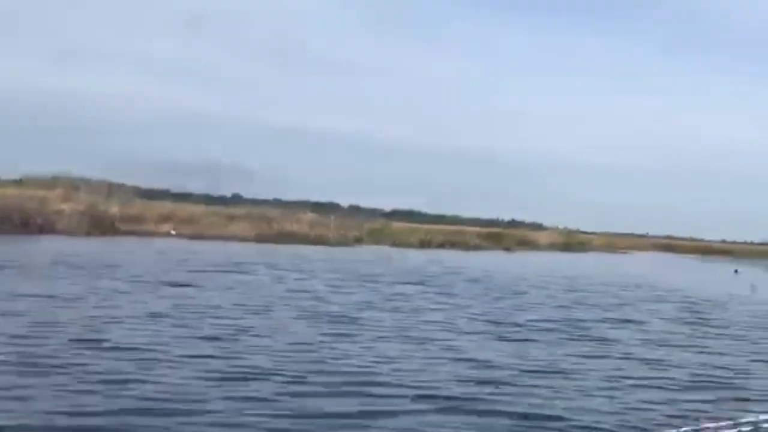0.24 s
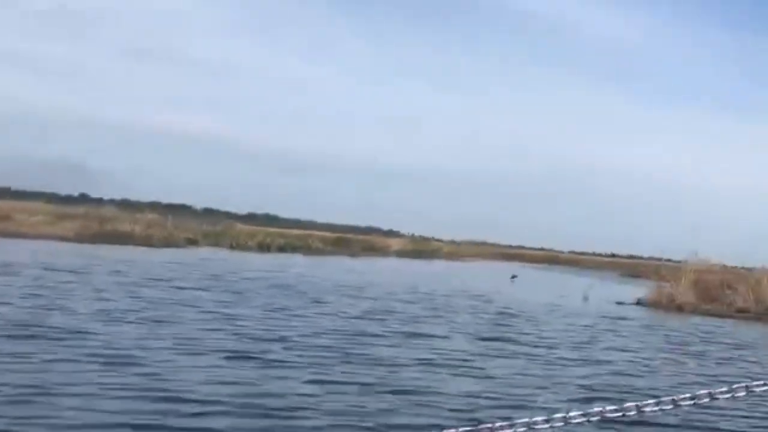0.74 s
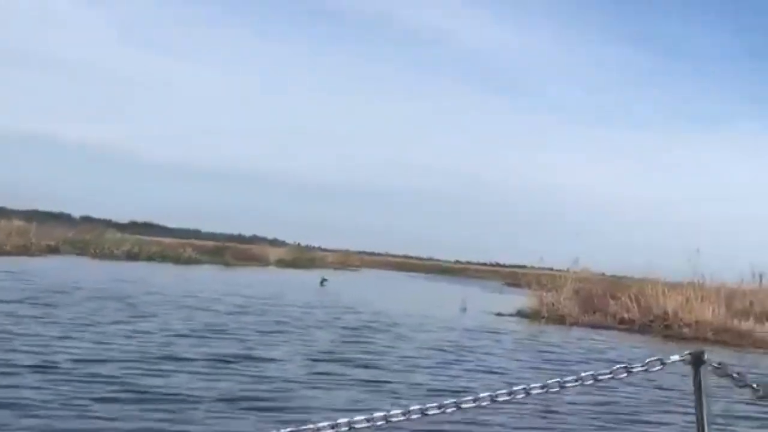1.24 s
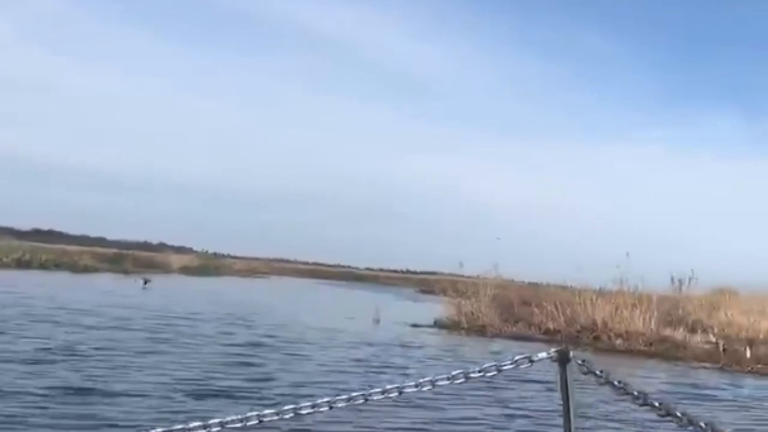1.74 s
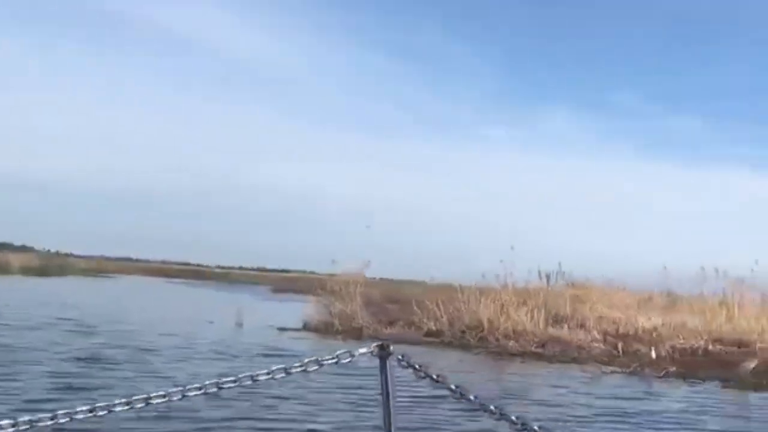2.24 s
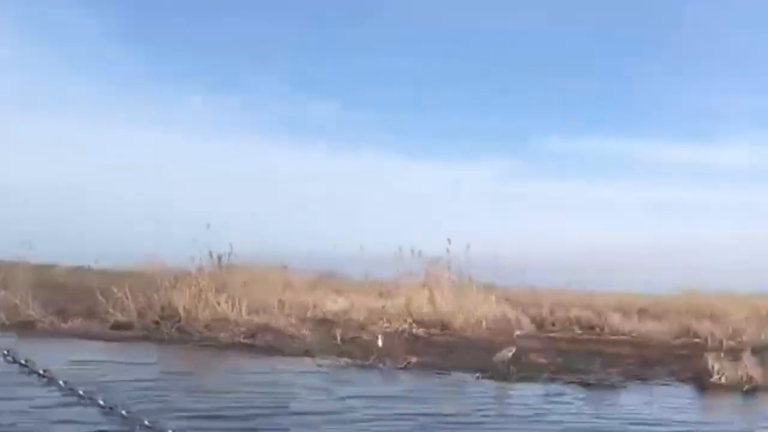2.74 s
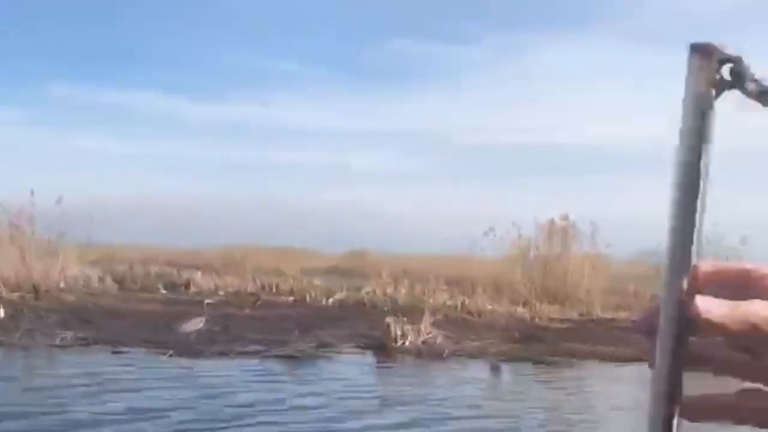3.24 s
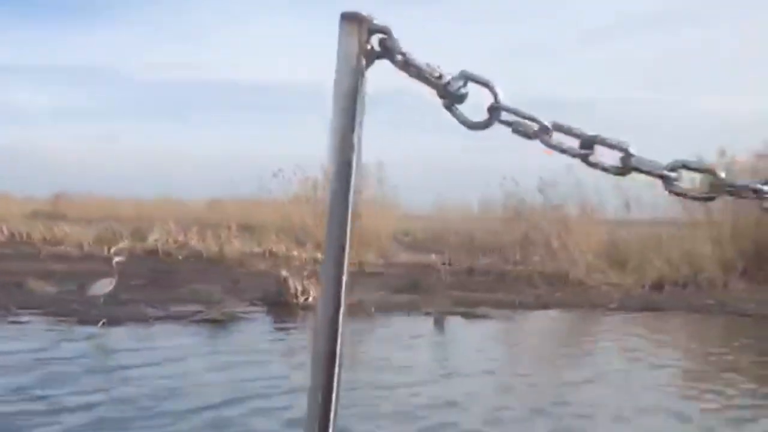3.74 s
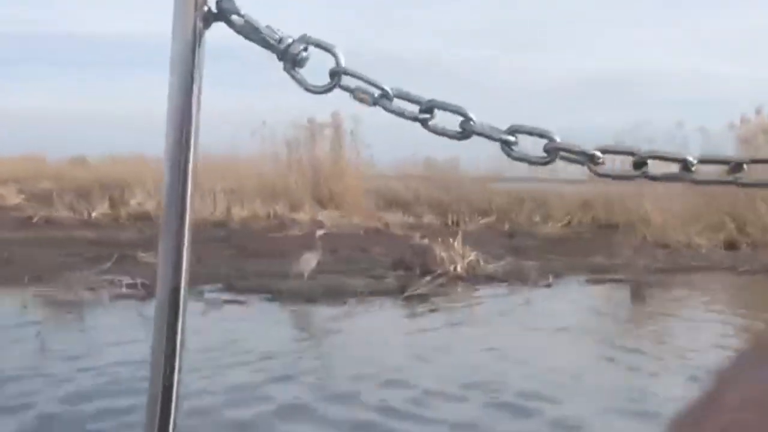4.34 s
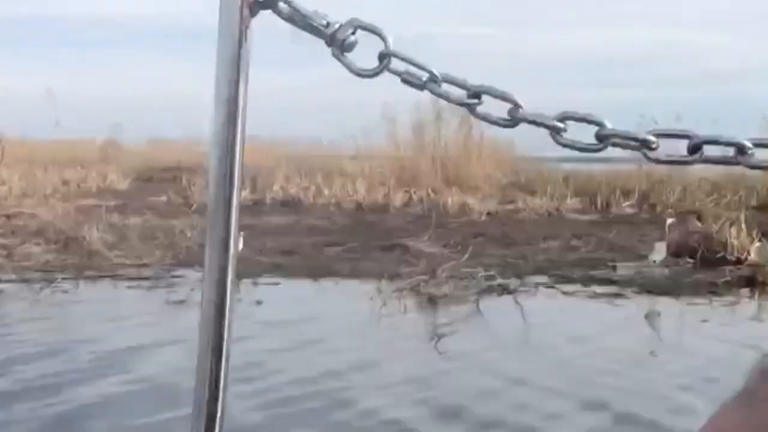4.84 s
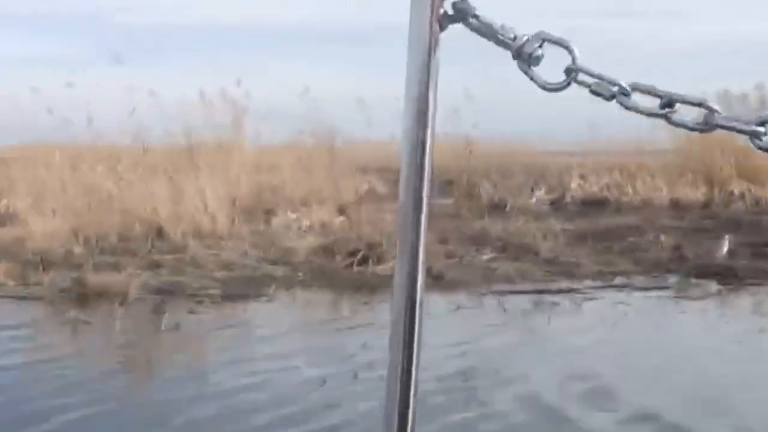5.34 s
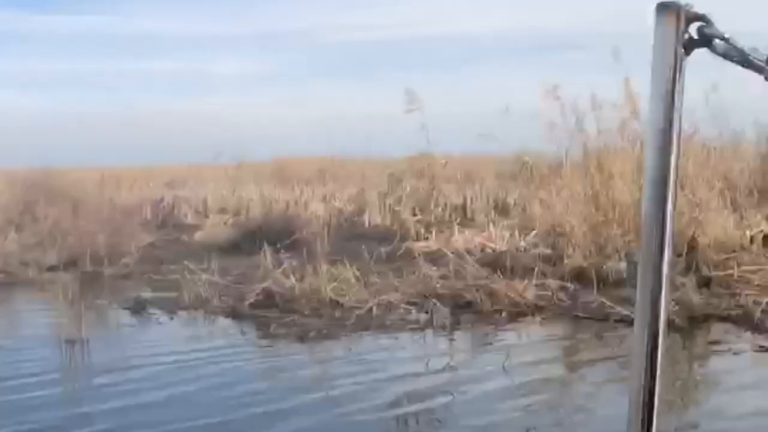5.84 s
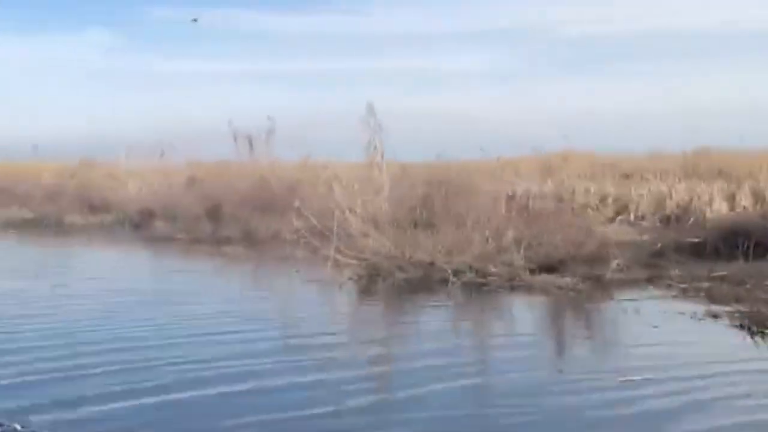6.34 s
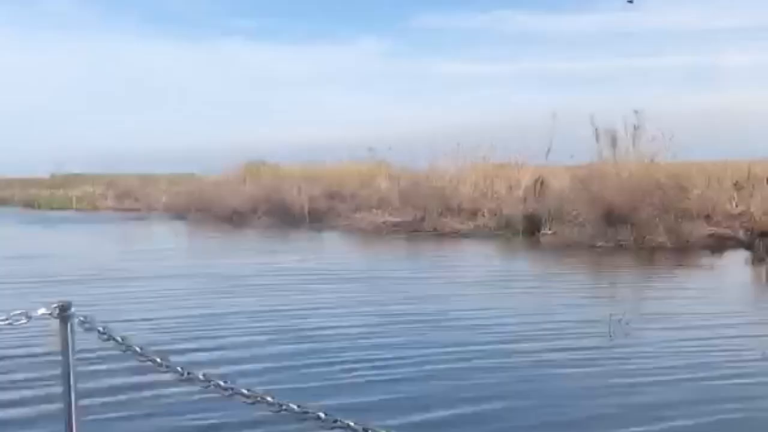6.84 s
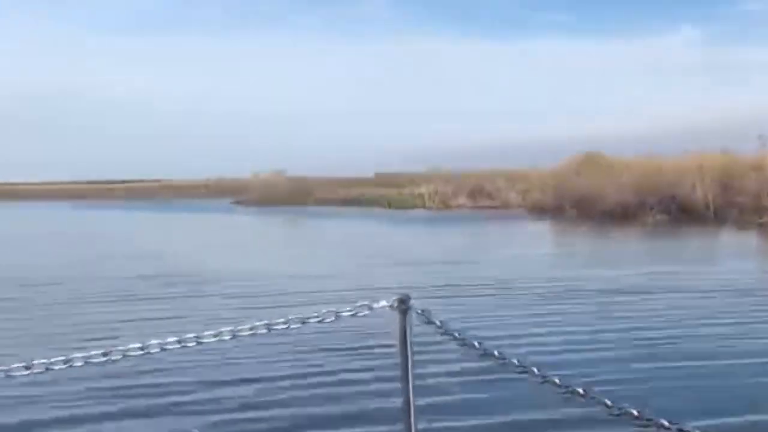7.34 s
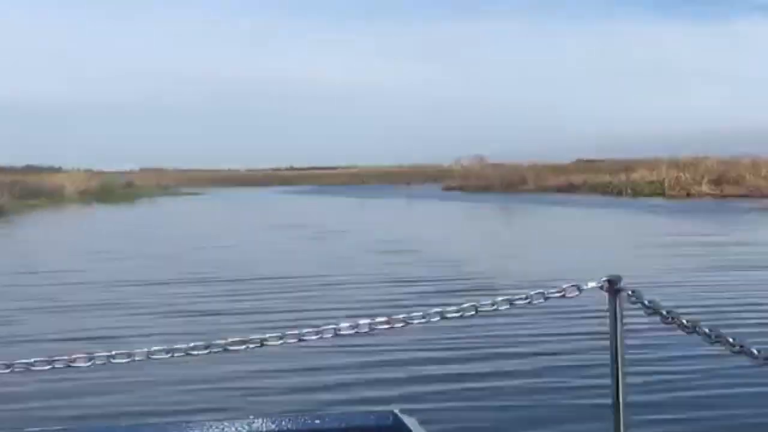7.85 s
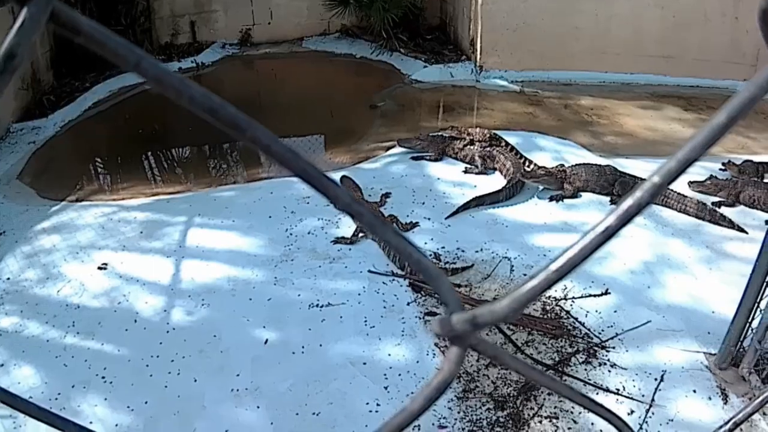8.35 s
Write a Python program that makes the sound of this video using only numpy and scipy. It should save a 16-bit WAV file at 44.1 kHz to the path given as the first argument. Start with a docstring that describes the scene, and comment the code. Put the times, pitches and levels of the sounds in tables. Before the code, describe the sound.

Loud, nasal airboat drone with roaring wind and water, dropping in pitch near the end before a sudden stop.

```python
"""A nasal propeller drone over roaring wash: an airboat on open marsh water, heard from its front seats.
Three blades chop the air; a V8 beats against them through a whining toothed reduction belt.
Wash and spray grow louder while the microphone swings aside. Brief hoots, a hull knock, wind buffets.
Near the end the throttle eases: pitch falls, the exhaust pops, a thin whistle rises. Abrupt stop."""
import sys
import numpy as np
from scipy import signal
from scipy.fft import rfft, irfft, next_fast_len
from scipy.io import wavfile
from scipy.ndimage import uniform_filter1d

SR = 44100
rng = np.random.default_rng(int(sys.argv[2]) if len(sys.argv) > 2 else 0)


def inscribe(sig):
    """Save sig as 16-bit PCM at rate SR to the path in sys.argv[1].

    A 1-D sig is mono; a 2-D sig holds one channel per row.
    Samples are clipped to [-1, 1] before scaling.
    """
    pcm = np.round(np.clip(np.atleast_2d(sig).T, -1, 1) * 32767)
    wavfile.write(sys.argv[1], SR, pcm.astype(np.int16))


N = 379695
TIME_S = np.arange(N) / SR
BLADE_COUNT, PROP_TEETH, CRANK_TEETH = 3, 110, 48
CRUISE_HZ, COAST_HZ_PER_S = 82, 14

# Blade-pass rate: t/s, f/Hz
BLADE_RATE = [(0, 86.6), (0.25, 85.95), (1.2, 85.4), (2.1, 83.1), (2.8, 81.9), (3.2, 81.65), (4.4, 81.8),
              (4.8, 81.4), (5.2, 81.25), (6, 81.55), (6.3, 81.3), (6.5, 80.4), (6.7, 78.4), (7.1, 72.7),
              (7.3, 71.1), (7.6, 70.05), (8.2, 69.75)]
# Microphone swing toward the stern: t/s, turn (0 ahead, about 1 at widest)
MIC_TURN = [(0, 0.15), (2.6, 0.03), (3.2, 0.56), (3.8, 0.84), (4.55, 0.95), (5.2, 0.88), (6.1, .66),
            (6.7, 0.42), (7.1, 0), (8.2, 0.13)]

# Level laws: cruise level/dB, speed slope/(dB/Hz), turned/dB, coasting/dB
RUMBLE_LAW = (-32.5, -0.15, 3.5, -0.5)
ROAR_LAW = (-25, 0.06, 5, 2)
HISS_LAW = (-34.6, 0.17, 2, -1)
SPRAY_LAW = (-41, -0.06, 12, 0.5)
# Blade harmonics except the 4th: order, then the four level-law columns
BLADE_LAWS = [(1, -13.5, 1.1, -1, 1.5), (2, -27.5, -0.2, -1, -1), (3, -32.5, -0.1, 4, -1),
              (5, -36.5, 0.67, 6.5, -10.5), (6, -38.5, 0, -1, -4), (7, -43, .1, 8, -3),
              (8, -43, -0.1, 3.5, -6), (9, -42, 0, -3.5, 3.5), (10, -42, -0.2, 6.5, -1.5),
              (11, -40, 0.64, -0.5, 4), (12, -44.5, -0.2, -4, -2.5), (13, -48.5, -0.6, 1.5, -7),
              (15, -51, -0.1, 2.5, -0.5), (20, -53.5, 0.5, 0.5, -3.5), (24, -60, -0.5, 5.5, -5)]
# Nasal 4th blade harmonic: t/s, level/dB
NASAL_LEVEL = [(0, -19.5), (0.7, -20.5), (1.6, -21), (1.9, -27), (2.65, -30), (3.05, -25), (4.4, -22.5),
               (5.4, -23.5), (5.9, -27), (6.35, -25.5), (6.9, -38), (7.4, -29.5), (8.2, -34)]
# Propeller cage resonances: f/Hz, width/Hz, lift/dB
CAGE_MODES = [(344.3, 23.6, 13), (601.8, 7.7, 10)]

# Rumble of unevenly firing banks: four-stroke cycle order, relative level/dB
RUMBLE_ORDERS = [(2, -5), (3, 1), (6, -11), (7, -9), (8, -17), (10, -17), (12, -17), (15, -19), (16, -19),
                 (18, -14), (24, -22)]
# Exhaust boom, 5th cycle order: t/s, level/dB
BOOM_LEVEL = [(0, -39), (1.2, -30), (1.95, -21.5), (2.7, -42), (5.2, -25), (6.6, -30), (6.9, -27),
              (7.25, -19.5), (8.2, -17)]
# Belt tooth tone and its octave: t/s, level/dB
TOOTH_LEVEL = [(0, -40), (0.5, -48), (0.9, -42), (1.5, -42.5), (1.85, -33), (2.25, -49), (2.45, -34.5),
               (2.6, -41.5), (2.98, -30.5), (3.25, -39), (3.7, -38.5), (4.7, -41.5), (5.2, -49),
               (5.6, -40.5), (6.27, -34.5), (6.47, -41), (6.68, -52), (6.8, -38.5), (6.93, -39.5),
               (7.08, -53), (7.4, -47), (8.2, -56)]
OCTAVE_LEVEL = [(0, -56), (1.85, -49), (2.6, -55), (6.3, -58), (6.7, -54), (6.92, -45), (7.1, -52),
                (7.38, -45), (7.65, -51), (8.0, -46), (8.2, -39)]

# Noise spectra: f/Hz, relative density/dB
ROAR_SPECTRUM = [(20, -27), (35, -24), (55, 1.5), (80, -1), (130, -0.5), (210, 0.5), (270, -1.5),
                 (350, -2.5), (550, -6.5), (800, -13.5), (1400, -23.5), (3000, -54.5)]
SWISH_SPECTRUM = [(250, -32.5), (500, -13.5), (750, 1), (950, -2.5), (1300, -4.5), (1900, -13),
                  (3000, -30.5), (8000, -39.5)]
HISS_SPECTRUM = [(900, -8), (1800, -1), (2500, 0), (3400, 1.5), (4800, -2.5), (6400, -3), (8000, -6.5),
                 (11500, -12), (15500, -14)]
SPRAY_SPECTRUM = [(1000, -15.5), (1700, 6.5), (2400, 12), (3500, 0.5), (6500, 0.5), (10000, -9),
                  (12500, -16.5), (14000, -0.5), (15300, -3), (16000, 4)]
BUFFET_SPECTRUM = [(20, -16), (40, -10), (60, -1), (90, -1), (160, -5), (400, -31), (2000, -75.5)]
WHISTLE_SPECTRUM = [(5500, -45.5), (6700, -10), (7050, 0.5), (7300, -9), (7700, -7.5), (9500, -36.5)]
# Blade swish and whistle envelopes: t/s, level/dB
SWISH_LEVEL = [(0, -25.5), (0.17, -29), (0.8, -30.5), (1.6, -30), (2.6, -34), (3.6, -32.5), (4.4, -33.5),
               (6.3, -31.5), (7.0, -34.5), (7.7, -36.5), (8.2, -33.5)]
WHISTLE_LEVEL = [(7.0, -75), (7.35, -52), (7.6, -43), (7.8, -49), (8.0, -47), (8.2, -51)]

# Hoots in the rushing air: t/s, length/s, f/Hz, level/dB
HOOTS = [(0.043, 0.09, 1102, -29), (0.103, 0.05, 1290, -30), (0.125, 0.12, 470, -25), (2.76, .06, 530, -30),
         (5.13, 0.031, 674, -30), (5.36, 0.073, 505, -24), (6.648, .08, 592, -25), (6.796, .14, 1290, -36),
         (7.368, 0.08, 713, -29.5), (7.405, 0.052, 940, -34)]
# Hull knock: t/s, peak/dB
KNOCKS = [(0.2615, -15.5)]
# Wind on the microphone: t/s, length/s, level/dB
BUFFETS = [(0.34, 0.15, -20), (7.35, 0.1, -22), (8.074, 0.18, -21.5)]
# Exhaust pops: t/s, peak before the muffler/dB
POPS = [(6.62, -15), (7.168, -14), (7.239, -11.5)]
# Hull and exhaust pipe resonances: f/Hz, width/Hz, relative level/dB
HULL_MODES = [(1100, 300, -4), (1900, 430, 22), (2800, 700, -6)]
PIPE_MODES = [(328, 140, 7), (620, 230, 2), (826, 200, -14)]


def undb(db):
    """Decibels to gain."""
    return np.exp(np.asarray(db) * (np.log(10) / 20))


def curve(table):
    """(t/s, value) points to one value per sample."""
    return np.interp(TIME_S, *np.transpose(table))


def unit_rms(x):
    """Scale to rms 1."""
    return x / np.sqrt(np.mean(x ** 2))


def noise(spectrum):
    """Shaped noise, rms 1."""
    hz, db = np.transpose(spectrum)
    size = next_fast_len(N, True)
    bins_hz = np.maximum(np.fft.rfftfreq(size, 1 / SR), 1)
    gain = undb(np.interp(np.log(bins_hz), np.log(hz), db))
    return unit_rms(irfft(rfft(rng.standard_normal(size)) * gain, size)[:N])


def jitter(rate_hz):
    """Random points at rate_hz, joined by lines; rms 1."""
    points = rng.standard_normal(4096)
    return unit_rms(np.interp(TIME_S * rate_hz, np.arange(len(points)), points))


def tone(turns, rms_db):
    """Cosine partial; phase in turns."""
    return np.sqrt(2) * undb(rms_db) * np.cos(2 * np.pi * turns)


def bursts(events, modes, decay_s):
    """Decaying noise pushes ring a set of resonances."""
    out, age_s = np.zeros(N), TIME_S[:SR // 4]
    for start_s, peak_db in events:
        push = rng.standard_normal(len(age_s)) * np.exp(-age_s / decay_s)
        ring = sum(undb(db) * signal.lfilter(*signal.iirpeak(hz, hz / width_hz, fs=SR), push)
                   for hz, width_hz, db in modes)
        start = int(start_s * SR)
        out[start:start + len(ring)] += undb(peak_db) * ring / np.abs(ring).max()
    return out


def boat_state(blade_hz):
    """Blade rate above cruise/Hz, microphone turn, coasting (0-1)."""
    slowing_hz_per_s = uniform_filter1d(-np.gradient(blade_hz) * SR, size=SR // 4)
    coast = np.clip(slowing_hz_per_s / COAST_HZ_PER_S, 0, 1)
    return blade_hz - CRUISE_HZ, curve(MIC_TURN), coast


def law_db(law, state):
    """Level law evaluated at the boat's state."""
    cruise_db, db_per_hz, turned_db, coasting_db = law
    excess_hz, turn, coast = state
    return cruise_db + db_per_hz * excess_hz + turned_db * turn + coasting_db * coast


def propeller(blade_turns, blade_hz, state, lag_turns=0.036, smear_turns=0.03, scatter_turns=0.031):
    """One pressure pulse per blade; gusty inflow shakes its timing and, most, its upper harmonics."""
    orders, *law_columns = np.transpose(BLADE_LAWS)

    def harmonic_db(k):
        db = law_db([np.interp(k, orders, column) for column in law_columns], state)
        return db + cage_lift_db(k * blade_hz) if k < 10 else db

    swell_turns = blade_turns + 0.003 * jitter(35)
    crest_turns = swell_turns - lag_turns  # sharp crest trails the broad swell
    load_db = 2.02 * jitter(30)
    fundamental_db = np.minimum(harmonic_db(1), -10.4)
    out = tone(swell_turns, fundamental_db + 0.42 * jitter(17))
    out += tone(2 * crest_turns, harmonic_db(2) + load_db)
    out += tone(4 * crest_turns, curve(NASAL_LEVEL) + 0.5 * load_db)
    for k in [3, *range(5, 25)]:
        level_db = harmonic_db(k) + load_db + 2.5 * jitter(6)
        chirp_turns = k * crest_turns - smear_turns * k * k  # cage and hull spread the crest
        out += tone(chirp_turns + scatter_turns * jitter(6), level_db)
    return out


def cage_lift_db(hz):
    """Cage resonances lift a harmonic passing through them."""
    return sum(db / (1 + (2 * (hz - centre_hz) / width_hz) ** 2)
               for centre_hz, width_hz, db in CAGE_MODES)


def exhaust(cycle_turns, state, uneven_db=0.3, wander_turns=0.016):
    """V8 cycle orders fall between the blade tones and throb against them."""
    rumble_db = law_db(RUMBLE_LAW, state)
    out = tone(5 * cycle_turns, curve(BOOM_LEVEL) + 0.7 * jitter(12))
    for k, db in RUMBLE_ORDERS:
        order_turns = k * cycle_turns + wander_turns * jitter(11)
        out += tone(order_turns, rumble_db + db + uneven_db * jitter(14))
    return out


def belt(crank_turns, wobble_turns=0.027, wobble_depth=0.18, flutter_db=1.5, rough_turns=0.17):
    """Teeth mesh on the crank pulley; tension swings once per turn, the free span flaps at random."""
    tooth_db, octave_db = curve(TOOTH_LEVEL), curve(OCTAVE_LEVEL)
    tension = np.sin(2 * np.pi * crank_turns)
    mesh_turns = CRANK_TEETH * crank_turns + wobble_turns * tension + 0.03 * jitter(50)
    whine = tone(mesh_turns, tooth_db + flutter_db * jitter(35))
    whine += tone(2 * mesh_turns, octave_db + flutter_db * jitter(50))
    # air squeezed from the teeth: a rough band round each tone
    rough = tone(mesh_turns + rough_turns * jitter(350), 0.5 * tooth_db - 22.5) * jitter(300)
    rough += tone(2 * mesh_turns + rough_turns * jitter(500), 0.13 * octave_db - 41.5) * jitter(450)
    return whine * (1 + wobble_depth * tension) + rough


def wash(blade_turns, cycle_turns, state):
    """Turbulence pulses with blades and firings and swells in gusts; spray fizzes off the hull."""
    blade_rad = 2 * np.pi * blade_turns
    chop = np.cos(blade_rad) + 0.78 * np.cos(2 * blade_rad) + 0.75 * np.cos(3 * blade_rad)
    firing = 0.074 * np.cos(2 * np.pi * 8 * cycle_turns)
    gust_db = 0.8 * jitter(18)
    roar_db = law_db(ROAR_LAW, state) + gust_db + 1.2 * jitter(40)
    swish_db = curve(SWISH_LEVEL) + gust_db + jitter(30)
    roar = noise(ROAR_SPECTRUM) * (1 + 0.2 * chop) * undb(roar_db)
    swish = noise(SWISH_SPECTRUM) * (1 + 0.053 * chop + firing) * undb(swish_db)
    hiss = noise(HISS_SPECTRUM) * (1 + 0.056 * chop + firing)
    hiss *= undb(law_db(HISS_LAW, state) + 0.5 * gust_db + 0.5 * jitter(22))
    spray = noise(SPRAY_SPECTRUM) * (1 + 0.056 * chop)
    spray *= undb(law_db(SPRAY_LAW, state) + 0.61 * gust_db + 1.5 * jitter(400))
    return roar + swish + hiss + spray


def hoots(glide_hz_per_s=-400):
    """Short breathy tones; pitch sinks as they swell and fade."""
    breath_turns = 0.16 * jitter(110)
    out = np.zeros(N)
    for centre_s, length_s, hz, db in HOOTS:
        near = np.abs(TIME_S - centre_s) < 2 * length_s
        offset_s = TIME_S[near] - centre_s
        turns = hz * offset_s + 0.5 * glide_hz_per_s * offset_s ** 2 + breath_turns[near]
        out[near] += tone(turns, db) * np.exp(-(2 * offset_s / length_s) ** 2)
    return out


def hull_knock():
    """Metal rattles briefly on the hull."""
    return bursts(KNOCKS, HULL_MODES, decay_s=0.0066)


def wind_buffets():
    """Wind hits the microphone: short swells of low rumble."""
    swell = sum(undb(db) * np.exp(-(2 * (TIME_S - centre_s) / length_s) ** 2)
                for centre_s, length_s, db in BUFFETS)
    return noise(BUFFET_SPECTRUM) * swell


def exhaust_pops(muffler_hz=1200):
    """Throttle closing: stray charges pop dully in the pipe."""
    muffler = signal.butter(3, muffler_hz, fs=SR, output="sos")
    return signal.sosfilt(muffler, bursts(POPS, PIPE_MODES, decay_s=0.015))


def whistle():
    """Narrow, wavering band of high hiss after the throttle eases."""
    return noise(WHISTLE_SPECTRUM) * undb(curve(WHISTLE_LEVEL) + 2 * jitter(22))


def scene():
    """One shaft speed drives propeller, engine and belt; mono mix."""
    blade_hz = curve(BLADE_RATE)
    state = boat_state(blade_hz)
    blade_turns = np.cumsum(blade_hz) / SR
    crank_turns = blade_turns / BLADE_COUNT * PROP_TEETH / CRANK_TEETH
    cycle_turns = crank_turns / 2  # four-stroke
    drive = propeller(blade_turns, blade_hz, state) + exhaust(cycle_turns, state) + belt(crank_turns)
    air = wash(blade_turns, cycle_turns, state) + wind_buffets() + hoots() + whistle()
    return (drive + air + hull_knock() + exhaust_pops())[None]


def record(dry):
    """Dead stop, peak clip, low-pass."""
    stop_s, decay_s, cutoff_hz = 8.207, 0.0017, 15800
    gate = np.exp(-np.maximum(TIME_S - stop_s, 0) / decay_s)
    lowpass = signal.ellip(10, 0.1, 90, cutoff_hz, fs=SR, output="sos")
    return signal.sosfilt(lowpass, np.clip(dry * gate, -1, 1))


dry = scene()
out = record(dry)
inscribe(out)
```